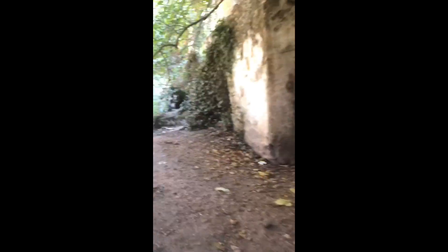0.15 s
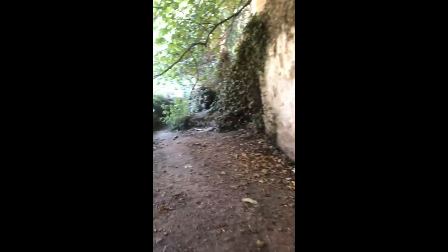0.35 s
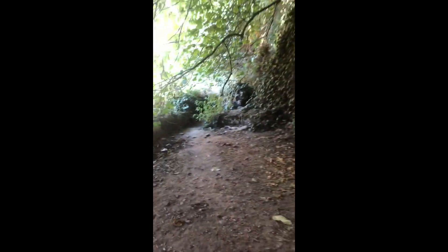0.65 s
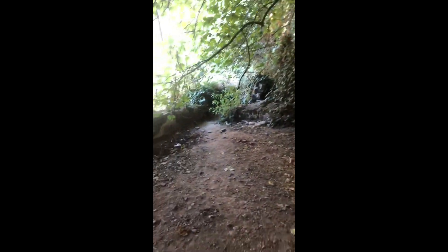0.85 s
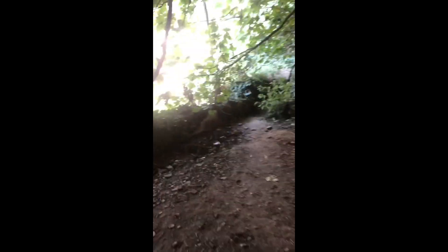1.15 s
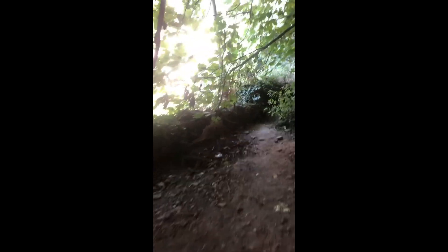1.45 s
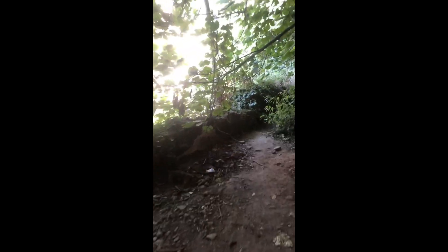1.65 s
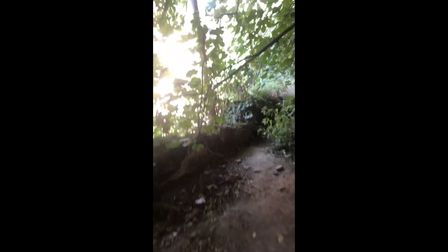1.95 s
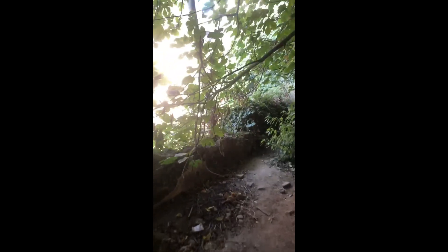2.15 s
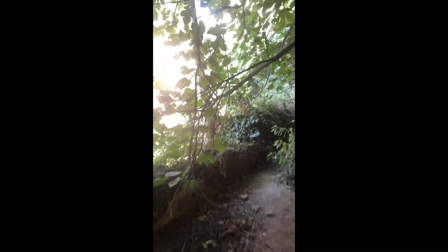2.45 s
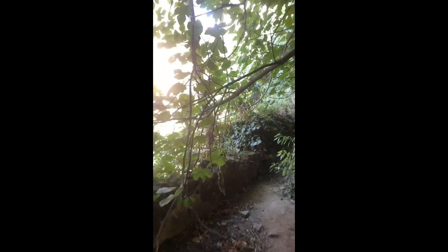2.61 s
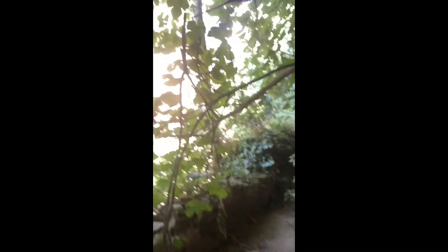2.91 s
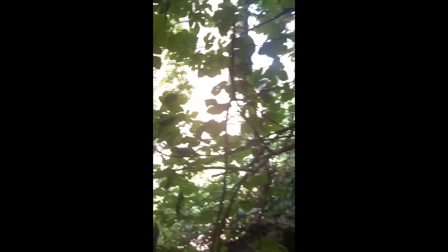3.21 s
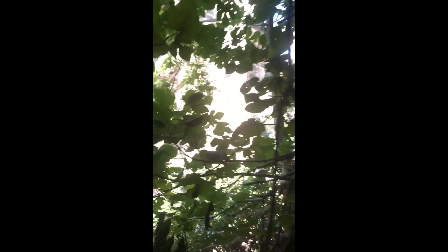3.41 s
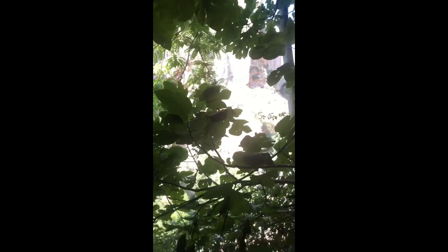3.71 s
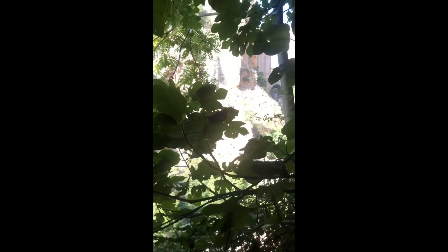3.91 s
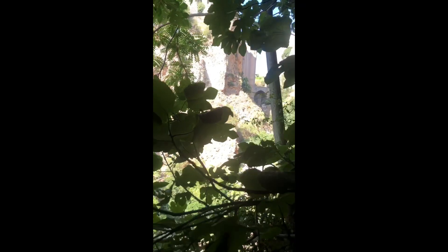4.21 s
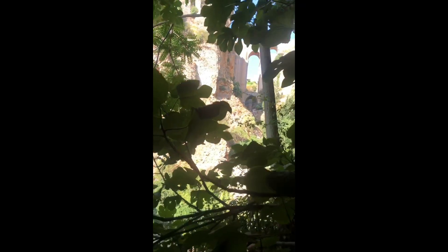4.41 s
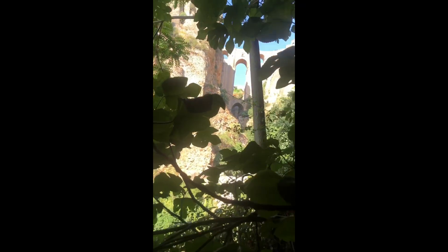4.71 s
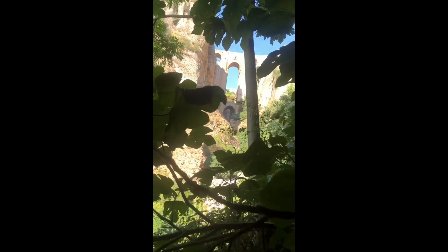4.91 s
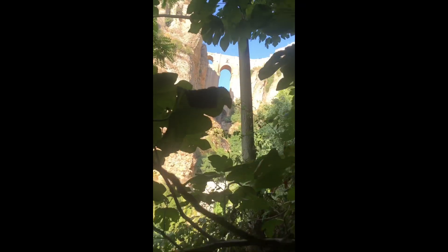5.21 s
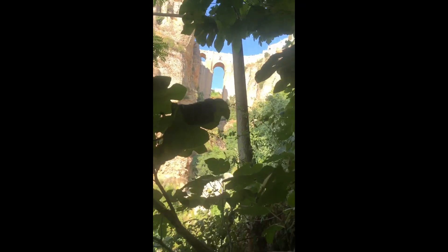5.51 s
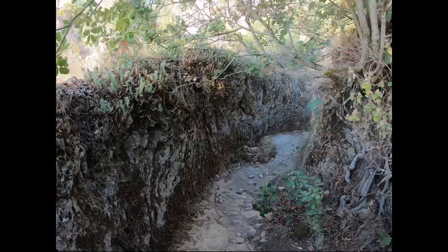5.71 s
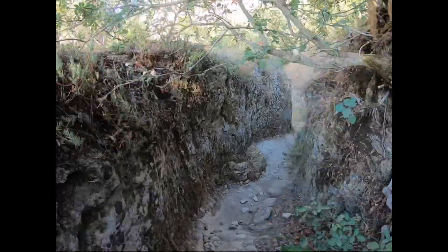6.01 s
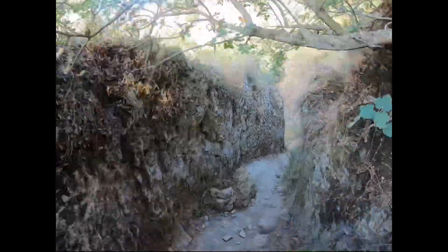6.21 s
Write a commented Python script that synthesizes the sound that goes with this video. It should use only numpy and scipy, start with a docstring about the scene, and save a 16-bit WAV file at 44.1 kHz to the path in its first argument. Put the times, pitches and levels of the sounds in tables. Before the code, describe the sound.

A quiet outdoor dirt path, heard from a microphone carried by the walker, centred. From 0 s a low rumble and soft hissing rush, like distant water and wind, lie under a gritty step with leaf ticks and tiny knocks. Further soft uneven steps fall near 0.5, 1.0, 1.5, 1.9, 2.4 and 2.9 s; the one at 1.9 is sharpest, with a cluster of stony knocks, and the one at 2.9 has a faint soil thud. The rush brightens and swells from 0.4 to 2.3 s. Two thin bird peeps sound far off at 0.9 and 1.0 s. From 3.1 s the rush rises again, fuller, until 4.4. The last step at 3.6 s brings faint metal clinks, brighter at 3.9 with a hard knock and leaf crackles. Gusts flutter in foliage around 3.4, 4.3 and 5.6 s, with sparse leaf flicks. A final bright clink at 5.65 s is cut by a quick fade; silence follows from 5.7 s.

```python
"""On a dirt path with dry leaves, beside a wall, soft uneven steps begin, with crunching grit and short knocks.
A broad rush, probably distant water in the gorge and wind, rises twice: past the wall, then at the edge.
A far bird peeps twice near 0.9 s; the walker's last step at 3.6 s brings clinks of a small metal piece.
The rush, gusts and a few leaf flicks go on until a final clink near 5.65 s and a quick fade to silence.
Steps and rush are shaped noise, knocks and metal are decaying sines, and the bird is gliding sines."""
import sys
import numpy as np
from scipy import signal
from scipy.fft import rfft, irfft
from scipy.io import wavfile
from scipy.ndimage import uniform_filter1d

SR = 44100
rng = np.random.default_rng(int(sys.argv[2]) if len(sys.argv) > 2 else 0)


def inscribe(sig):
    """Save sig as 16-bit PCM at rate SR to the path in sys.argv[1].

    A 1-D sig is mono; a 2-D sig holds one channel per row.
    Samples are clipped to [-1, 1] before scaling.
    """
    pcm = np.round(np.clip(np.atleast_2d(sig).T, -1, 1) * 32767)
    wavfile.write(sys.argv[1], SR, pcm.astype(np.int16))


N = 280035  # samples, 6.35 s


def amp(db):
    """Decibels to gain."""
    return 10 ** (np.asarray(db) / 20)


def evened(x):
    """Scales to an rms of 1."""
    return x / np.sqrt(np.mean(x ** 2) + 1e-20)


def read(points, hz):
    """Reads a spectrum on a log-frequency axis."""
    f, value = np.transpose(points)
    return np.interp(np.log(hz + 1), np.log(f + 1), value)


def add(mix, s, sound):
    """Mixes a sound in at time s, in seconds."""
    part = mix[max(round(s * SR), 0):][:len(sound)]
    part += sound[:len(part)]


def coloured(x, gain):
    """Filters x by a gain that is a function of frequency."""
    hz = np.fft.rfftfreq(len(x), 1 / SR) + 1  # the offset avoids 0 Hz
    return irfft(rfft(x) * gain(hz), len(x))


def hump(x, hz, octaves):
    """Keeps a bell of frequencies around hz."""
    return coloured(x, lambda f: np.exp(-(np.log2(f / hz) / octaves) ** 2 / 2))


def waver(count, rate_hz):
    """A smooth random wander of rms 1."""
    return evened(coloured(rng.standard_normal(count), lambda f: np.exp(-(f / rate_hz) ** 2)))


def crunch(level_db, length_s, hz, octaves, grains_per_s=1500, spread_db=4, slide=0.47):
    """A burst of tiny fractures of uneven size, over the fine noise of sliding dust."""
    u = np.arange(SR // 4) / SR / length_s
    press = u * np.exp(1 - 3 * u) * 3  # peaks a third of the way through the length
    chance = rng.random(len(u))
    sizes = rng.exponential(1, len(u))
    dust = rng.standard_normal(len(u))
    breaks = chance < grains_per_s / SR
    grains = breaks * np.sign(dust) * amp(spread_db * np.minimum(sizes, 3))
    sound = hump((evened(grains) + slide * dust) * press, hz, octaves)
    rms = np.sqrt(np.sum(sound ** 2) / (length_s * SR))
    return amp(level_db) * sound / rms


def knock(peak_db, hz, decay_s):
    """A heavily damped ring of a few cycles; peak_db is the top of its envelope."""
    t = np.arange(SR // 20) / SR
    envelope = t / decay_s * np.exp(1 - t / decay_s)
    return amp(peak_db) * envelope * np.sin(2 * np.pi * hz * t)


# Footfalls on the dirt, heel then toe: start_s, heel_level_db, heel_length_s, heel_centre_hz,
# heel_width_octaves, toe_delay_s, toe_level_db, toe_centre_hz
FOOTFALLS = [ (0.043, -50, 0.012, 1900, 1.4, 0.051, -59.5, 3620),
             (0.525, -54, 0.055, 1450, 1.1, 0.11, -73, 2000),
             (1.042, -56, 0.12, 1800, 1.1, 0.035, -56, 4200),
             (1.471, -59, .037, 2400, 1.2, 0.14, -62, 1500), (1.907, -50, 0.032, 1750, .6, .086, -54, 5700),
             (2.398, -56.5, 0.088, 2400, 1.3, 0.075, -65, 5000),
             (2.885, -56, 0.068, 1000, 0.94, .07, -65, 4500),
             (3.614, -54.5, 0.043, 1700, 1.1, 0.12, -52, 5400), ]
# Dry leaves flicking: start_s, level_db, length_s, centre_hz
LEAF_FLICKS = [ (0.044, -67, .014, 10500), (0.105, -63, 0.013, 11000), (0.1131, -54, .003, 10500),
               (0.1205, -58, .003, 14000), (1.075, -67, .02, 11000), (1.478, -64.5, .03, 9000),
               (1.9086, -54.5, .003, 8970), (1.9175, -54.5, .004, 10960), (1.928, -62, .018, 9800),
               (2.49, -63.5, .022, 14500), (3.734, -53.5, .011, 8500), (3.742, -56.5, .016, 12000),
               (3.812, -61.5, .022, 11500), (3.875, -52, 0.008, 10960), (3.888, -62.5, .02, 13000),
               (3.953, -55, 0.011, 9000), (4.797, -55, .008, 14530), (5.587, -55, .010, 13900), ]
# Short knocks underfoot; the one at 3.8728 s is probably the metal being struck:
# start_s, peak_db, pitch_hz, decay_s
SHORT_KNOCKS = [ (0.0445, -43, 1740, 0.00025), (0.0475, -43, 1490, 0.00043), (0.1074, -46, 3820, 0.00027),
                (0.1500, -40, 1400, 0.00035), (0.5390, -44, 3200, .00018), (1.0849, -38, 4950, .0003),
                (1.0885, -43, 3830, .0006), (1.1124, -41, 3050, .0004), (1.4854, -39, 5600, 0.00017),
                (1.9020, -43.5, 2190, .0004), (1.9093, -29, 2050, .00036), (1.9163, -34.5, 1800, .0006),
                (1.9188, -29.5, 4000, .00012), (1.9196, -31.5, 1800, .00033), (1.9245, -43, 1500, .0005),
                (1.9332, -38, 2000, .0004), (1.9468, -40, 2200, .0005), (2.4239, -40, 3800, .0003),
                (2.8697, -40, 1600, .0005), (2.8936, -33.5, 1700, .00034), (3.8728, -27.5, 4900, .00025), ]
# The weight of the foot landing on soil: start_s, peak_db (before the low cut), pitch_hz
SOIL_THUDS = [(1.911, -45, 760), (1.916, -46, 330), (2.897, -39, 230), (2.8995, -43, 750),
              (2.933, -42.5, 480), (2.949, -41.5, 250)]
# The sole drags just ahead of the heel; its level is relative to the heel
SCUFF_LEAD_S, SCUFF_S, SCUFF_DB, SCUFF_HZ, SCUFF_OCTAVES = 0.03, 0.14, -11, 1630, 0.79
TOE_S, TOE_OCTAVES = 0.023, 0.33  # the toe rolls off on finer grit
# A leaf snaps in few, sharp grains
LEAF_OCTAVES, LEAF_GRAINS_PER_S, LEAF_SPREAD_DB, LEAF_SLIDE = 0.3, 900, 4, 0.5


def steps(thud_decay_s=0.0014, thud_low_hz=90):
    """Each step scuffs, crunches under the heel and rolls off the toe; leaf flicks, knocks and thuds join in."""
    out = np.zeros(N)
    for s, heel_db, length_s, hz, octaves, toe_delay_s, toe_db, toe_hz in FOOTFALLS:
        add(out, s - SCUFF_LEAD_S, crunch(heel_db + SCUFF_DB, SCUFF_S, SCUFF_HZ, SCUFF_OCTAVES))
        add(out, s, crunch(heel_db, length_s, hz, octaves))
        add(out, s + toe_delay_s, crunch(toe_db, TOE_S, toe_hz, TOE_OCTAVES))
    for s, *shape in LEAF_FLICKS:
        add(out, s, crunch(*shape, LEAF_OCTAVES, LEAF_GRAINS_PER_S, LEAF_SPREAD_DB, LEAF_SLIDE))
    for s, *shape in SHORT_KNOCKS:
        add(out, s, knock(*shape))
    low_cut = signal.butter(2, thud_low_hz, "high", fs=SR)
    for s, *shape in SOIL_THUDS:
        add(out, s, signal.lfilter(*low_cut, knock(*shape, thud_decay_s)))
    return out


# The metal piece swinging against its clasp: start_s, level_db (before the trim in the mix), pitch_factor,
# tilt_db_per_octave (from the first mode up), twisting_modes_db, rasp_db (relative to level_db)
METAL_CONTACTS = [ (3.6170, -48, 1.015, 13, 3, -8), (3.6275, -55, 1.018, 16, 3, -5),
                  (3.8741, -44.5, .996, 13, -6, -6), (3.8840, -47, .996, 20, -11, 1),
                  (3.8950, -47, 1.001, 11, -6, -10), (3.9130, -51.5, .998, 10, -7, -3),
                  (3.9280, -56, 1, 8, -6, -6), (5.6521, -41, 1, 0, -3, 8), (5.6545, -41, 1, -2, 10, 12),
                  (5.6565, -28.3, 1, -6, 3, -15), ]
# Its modes, some in close pairs where the clasp damps one of the two:
# pitch_hz (before pitch_factor), level_db (relative), t60_s, twisting (0 bending, 1 twisting)
METAL_MODES = [ (5680, -2, .16, 0), (5660, 3.5, .026, 0), (7915, -10, .12, 1), (7990, -5, .022, 1),
               (11235, -25, .12, 0), (14720, -30, .07, 1), ]
CHATTER_HZ, CHATTER_DB, CHATTER_BEND = 170, 2.2, 0.005  # rate, rms depth, rms share of the pitch


def clinks(rasp_hz=5800, rasp_octaves=0.33, rasp_decay_s=0.0031, contact_s=0.00045):
    """Each contact rasps and rings the metal's modes; chatter on the clasp wavers strength and pitch."""
    t = np.arange(SR // 4) / SR
    out = np.zeros(N)
    first_hz = METAL_MODES[0][0]
    for s, level_db, pitch, tilt_db, twist_db, rasp_db in METAL_CONTACTS:
        bend = CHATTER_BEND * np.cumsum(waver(len(t), CHATTER_HZ)) / SR
        clock = pitch * (t + bend)  # running time, stretched by the pitch and its waver
        ring = np.zeros(len(t))
        for hz, db, t60_s, twists in METAL_MODES:
            mode_db = db + tilt_db * np.log2(hz / first_hz) + twist_db * twists
            strength = amp(mode_db + CHATTER_DB * waver(len(t), CHATTER_HZ))
            ring += strength * np.exp(-np.log(1000) * t / t60_s) * np.sin(2 * np.pi * hz * clock)
        rasp = evened(hump(rng.standard_normal(len(t)), rasp_hz, rasp_octaves)) * np.exp(-t / rasp_decay_s)
        onset = 1 - np.exp(-t / contact_s)
        add(out, s, amp(level_db) * (ring + amp(rasp_db) * rasp) * onset)
    return out


# The path opens out twice, past the wall and at the edge: start_s, length_s, hiss_gain_db, roar_gain_db
PATH_OPENINGS = [(0.358, 1.95, 4, 3), (3.068, 1.32, 3, 4.5)]
SHADED_HISS_DB, SHADED_ROAR_DB = -54.5, -58.5  # the rush as heard from behind the wall
HISS_RAMP_SHARE = 0.72  # the hiss completes its rise in this share of the opening's length


def openness():
    """Levels of hiss and roar in dB: each opening lifts both along a smooth ramp, the hiss sooner."""
    t = np.arange(N) / SR
    hiss_db, roar_db = SHADED_HISS_DB, SHADED_ROAR_DB

    def ramp(u):
        return np.sin(np.pi / 2 * np.clip(u, 0, 1))

    for s, length_s, hiss_gain_db, roar_gain_db in PATH_OPENINGS:
        hiss_db = hiss_db + hiss_gain_db * ramp((t - s) / (length_s * HISS_RAMP_SHARE))
        roar_db = roar_db + roar_gain_db * ramp((t - s) / length_s)
    return hiss_db, roar_db


# Spectrum of the broad rush, probably distant water in the gorge and wind; shared by roar and hiss:
# frequency_hz, relative_db
RUSH_SPECTRUM = [(59, -41), (100, 4.5), (129, 1), (177, -2.5), (205, 0.5), (254, -2), (341, -2),
                 (489, -3.5), (715, -4), (1410, -5), (2830, -9), (5010, -12), (7030, -15), (12400, -25),
                 (15700, -31.5)]
# Spectrum of the steady rumble: frequency_hz, relative_db
RUMBLE_SPECTRUM = [(20, -35.5), (35, -21), (50, -7.5), (62, -12.5), (79, 2.5), (100, -2.5), (160, -1),
                   (280, -3), (400, -12), (650, -27.5), (1500, -48)]
RUMBLE_DB = -60


def rush(patchy_db=0.72, low_hz=170, split_hz=800):
    """A steady rumble bends round the wall; roar and hiss swell as the wall stops shading them."""
    bins = 2048 // 2 + 1
    real, imag, patches = rng.standard_normal((3, N // 512 + 5, bins))
    patches = uniform_filter1d(patches, size=7, axis=0)  # smooth along time
    patches = evened(uniform_filter1d(patches, size=24, axis=1))  # and along frequency
    field = (real + 1j * imag) * amp(patchy_db * patches)  # eddies leave the noise slightly lumpy
    air = signal.istft(field.T, nperseg=2048, noverlap=1536)[1][:N]

    def above(f, edge_hz):
        return 1 / (1 + (edge_hz / f) ** 3)

    def roar_band(f):
        return above(f, low_hz) - above(f, split_hz)

    hiss = coloured(air, lambda f: amp(read(RUSH_SPECTRUM, f)) * above(f, split_hz))
    roar = coloured(air, lambda f: amp(read(RUSH_SPECTRUM, f)) * roar_band(f))
    rumble = coloured(rng.standard_normal(N), lambda f: amp(read(RUMBLE_SPECTRUM, f)))
    hiss_db, roar_db = openness()
    return evened(hiss) * amp(hiss_db) + evened(roar) * amp(roar_db) + evened(rumble) * amp(RUMBLE_DB)


# Gusts in the nearer foliage: middle_s, length_s, level_db, centre_hz
FOLIAGE_GUSTS = [(0.72, .4, -61, 1700), (1.48, 0.8, -57.5, 950), (1.9, 0.36, -58.5, 600),
                 (2.55, 0.61, -57.5, 900), (3.42, 0.33, -52, 460), (4.3, 0.7, -54, 1350),
                 (5.561, 0.28, -52.5, 350)]
# Slow low swells near 80 Hz in the rumble: middle_s, length_s, level_db
LOW_SWELLS = [(1.1, 0.42, -63.5), (1.68, .25, -63), (1.98, .3, -65.5), (3.583, .4, -64.5),
              (4.117, 0.32, -63)]
GUST_OCTAVES, LOW_SWELL_HZ, LOW_SWELL_OCTAVES = 0.79, 80, 0.25


def gusts(flutter_db=0.5):
    """Bands of noise swell and flutter as gusts in the nearer foliage; a low band swells slowly in the rumble."""
    t = np.arange(N) / SR

    def swell(middle_s, length_s):
        return np.sin(np.pi * np.clip((t - middle_s) / length_s + 0.5, 0, 1))

    def band(hz, octaves):
        return evened(hump(rng.standard_normal(N), hz, octaves))

    foliage = np.zeros(N)
    for middle_s, length_s, db, hz in FOLIAGE_GUSTS:
        foliage += amp(db) * swell(middle_s, length_s) * band(hz, GUST_OCTAVES)
    low_level = sum(amp(db) * swell(middle_s, length_s) for middle_s, length_s, db in LOW_SWELLS)
    low = low_level * band(LOW_SWELL_HZ, LOW_SWELL_OCTAVES)
    return foliage * amp(flutter_db * waver(N, rate_hz=16)) + low


# A far bird: start_s, level_db, length_s, start_hz, end_hz
BIRD_PEEPS = [ (0.903, -53.5, .042, 4330, 4480), (0.981, -52.5, .024, 4570, 4240), ]


def bird():
    """Two thin, gliding whistles: sines whose pitch moves in a straight line under a rounded swell."""
    out = np.zeros(N)
    for s, level_db, length_s, start_hz, end_hz in BIRD_PEEPS:
        hz = np.linspace(start_hz, end_hz, round(length_s * SR))
        swell = np.sin(np.linspace(0, np.pi, len(hz)))
        add(out, s, amp(level_db) * swell * np.sin(2 * np.pi * np.cumsum(hz) / SR))
    return out


def scatter(x, t60_s=0.63):
    """Short, sparse reflections from the ground, the wall and the trees."""
    t = np.arange(SR // 3) / SR
    taps = rng.standard_normal(len(t)) * (rng.random(len(t)) < 2000 / SR)  # about 2000 per second
    taps *= t > 0.004  # the first reflection arrives after 4 ms
    taps *= np.exp(-np.log(1000) * t / t60_s)
    return signal.fftconvolve(x, taps / np.linalg.norm(taps))[:N]


def scene(wet_db=-12, metal_db=-1.5):
    """One microphone feeds both channels; only the steps layer is heard reflected."""
    feet = steps()
    mix = rush() + gusts() + bird() + feet + amp(wet_db) * scatter(feet) + amp(metal_db) * clinks()
    return np.array([mix, mix])


FADE_START_S, FADE_END_S = 5.657, 5.686
EDGE_HZ = 15850  # upper limit of the band


def record(dry):
    """A quick fade to silence, then a steep low-pass limits the band."""
    faded = dry * np.interp(np.arange(N) / SR, [FADE_START_S, FADE_END_S], [1, 0])
    low_pass = signal.firwin(801, EDGE_HZ, window=("kaiser", 9), fs=SR)
    return signal.oaconvolve(faded, low_pass[None], "same")


dry = scene()
out = record(dry)
inscribe(out)
```